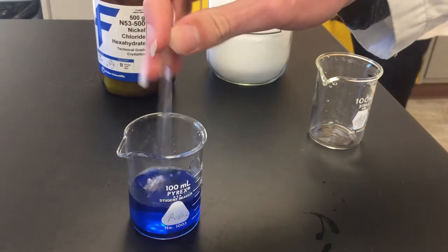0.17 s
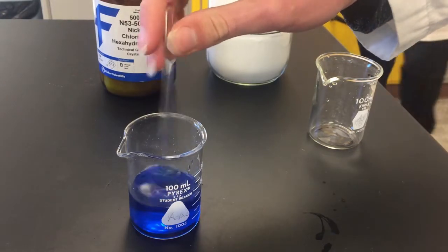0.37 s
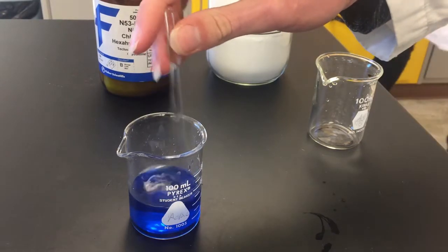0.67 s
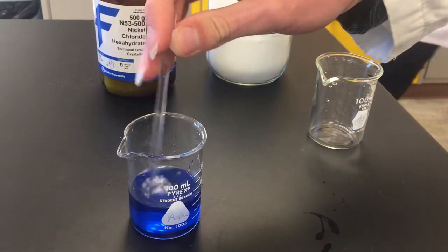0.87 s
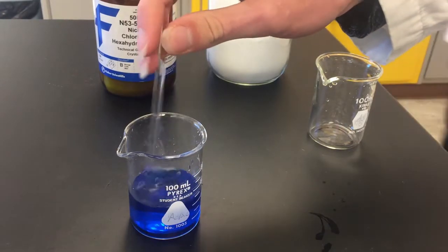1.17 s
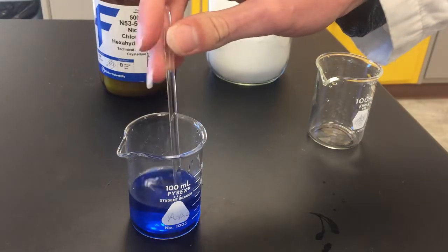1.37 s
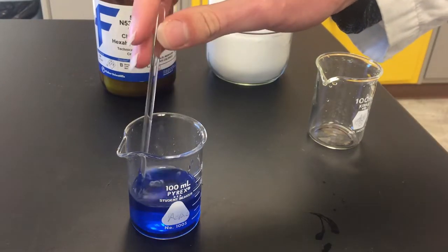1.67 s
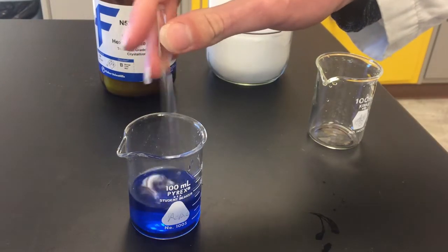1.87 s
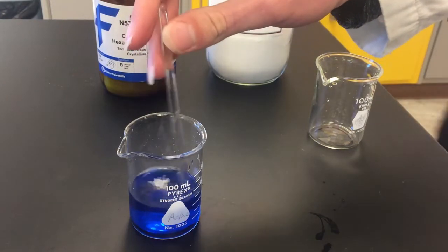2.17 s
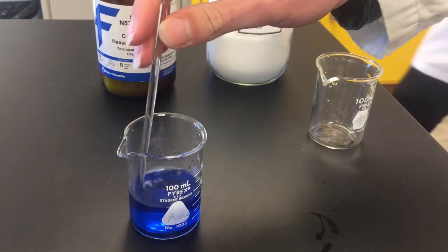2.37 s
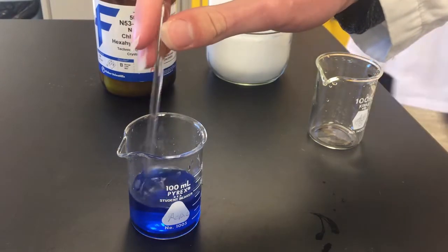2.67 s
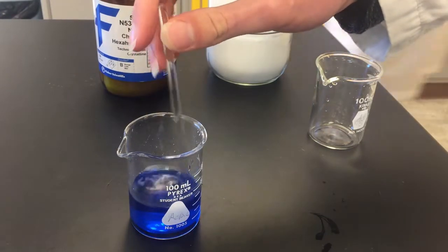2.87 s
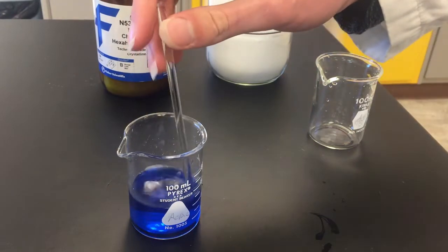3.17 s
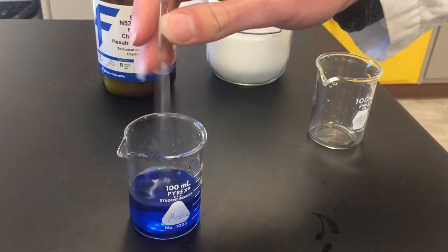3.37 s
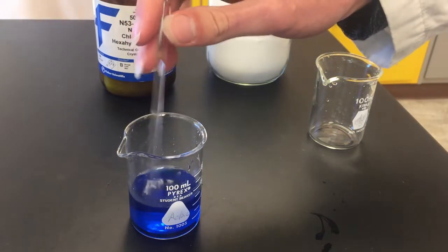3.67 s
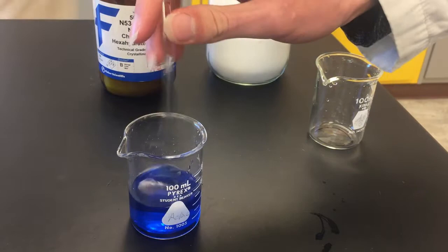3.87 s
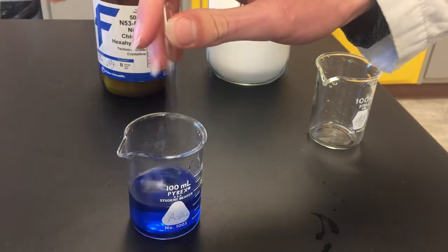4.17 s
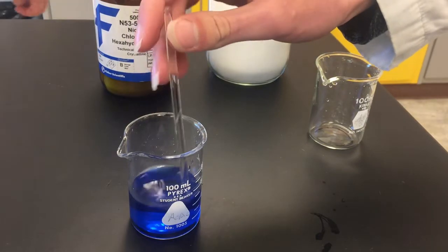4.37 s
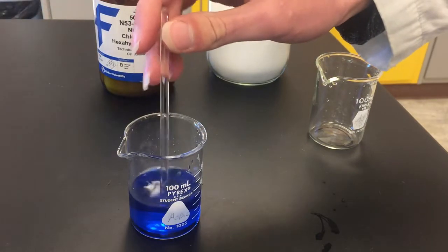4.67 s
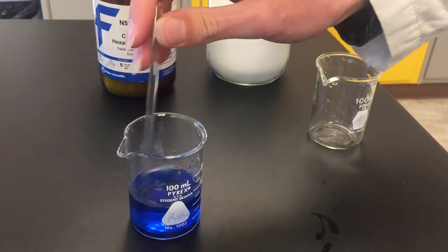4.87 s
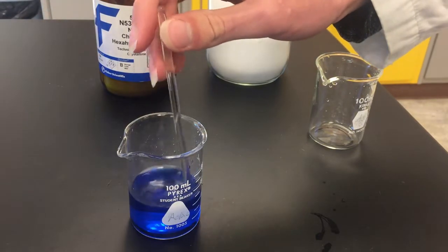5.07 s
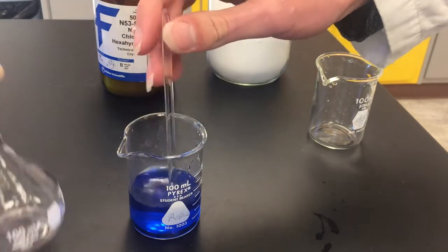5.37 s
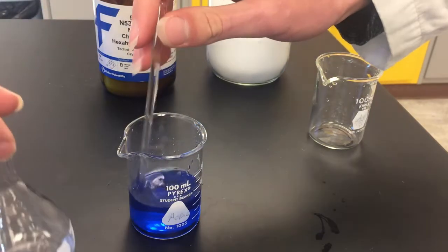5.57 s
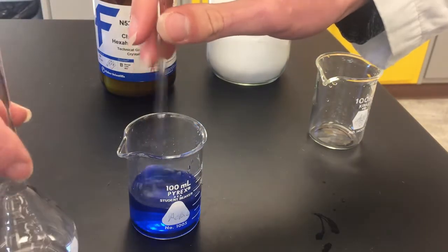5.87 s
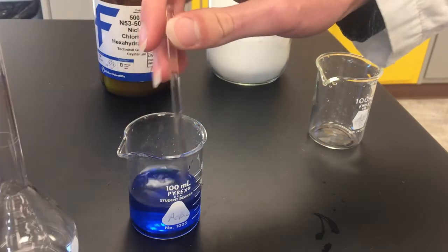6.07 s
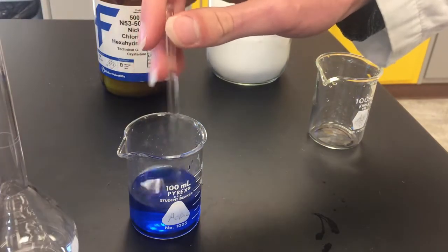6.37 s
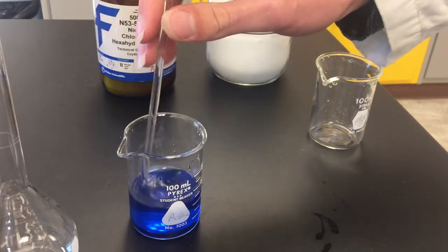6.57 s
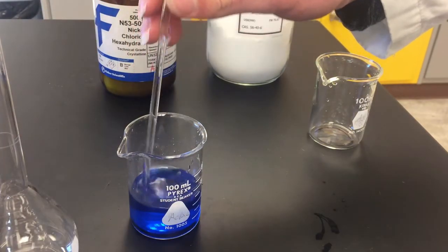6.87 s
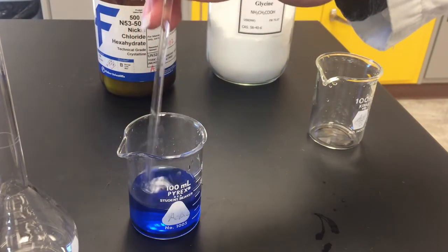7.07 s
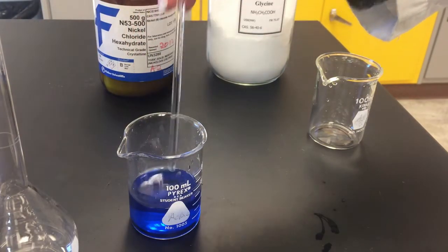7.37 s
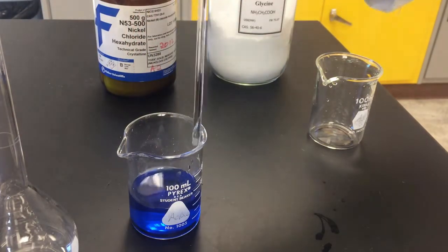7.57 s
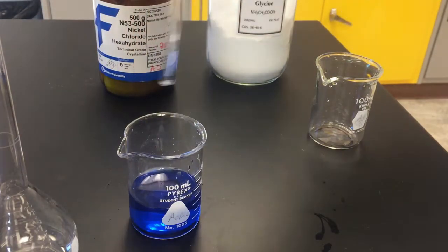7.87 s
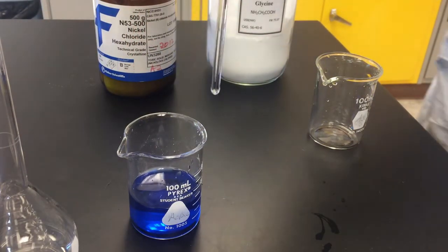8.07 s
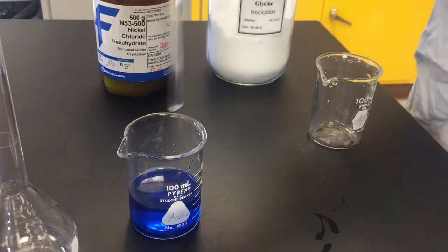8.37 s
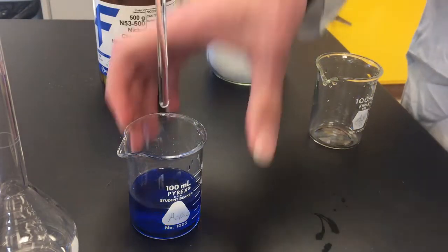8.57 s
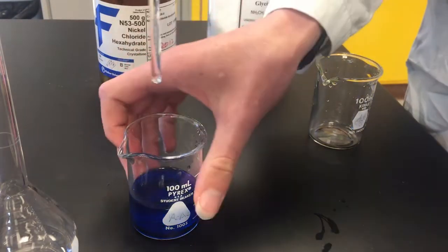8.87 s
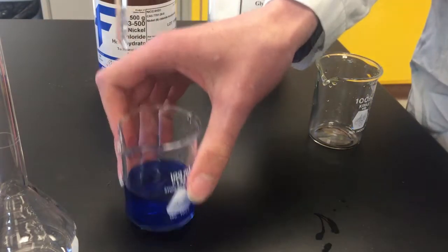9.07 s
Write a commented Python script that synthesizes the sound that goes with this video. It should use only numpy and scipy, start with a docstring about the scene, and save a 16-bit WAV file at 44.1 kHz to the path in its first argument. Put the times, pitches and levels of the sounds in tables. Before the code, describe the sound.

Light clinking and faint swishing as a glass rod stirs a beaker in a quiet laboratory; a flask is set down and rocks.

```python
"""Bright, quick clinks: a glass rod stirs a solution in a small beaker, ringing and skidding on the wall
while the liquid swishes. A flask lands on the bench beside it and rocks to rest; at last a hand takes
the beaker. Each knock on glass is a set of decaying modes plus a burst of gritty noise. Behind, someone
moves about on squeaking soles and ventilation rumbles in the quiet, slightly live laboratory."""
import sys
import numpy as np
from scipy import signal
from scipy.fft import rfft, irfft
from scipy.io import wavfile

SR = 44100
rng = np.random.default_rng(int(sys.argv[2]) if len(sys.argv) > 2 else 0)


def log_audio(samples):
    """Write samples as a 16-bit WAV file to the path given in sys.argv[1]."""
    # one column per channel
    frames = np.atleast_2d(samples).T
    # limit to full scale, then quantise
    limited = np.clip(frames, -1, 1)
    pcm = np.round(limited * 32767).astype(np.int16)
    wavfile.write(sys.argv[1], SR, pcm)


N = 406602
T = np.arange(int(.7 * SR)) / SR  # time axis of a one-shot, s


def undb(db):
    """Decibels to gain."""
    return 10 ** (np.asarray(db) / 20)


def fade(t60):
    """Exponential decay, 60 dB down after t60 seconds."""
    return np.exp(-np.log(1000) * T / max(t60, 1e-3))


def add(track, s, sound):
    """Mix a sound into the track at time s."""
    i = max(int(s * SR), 0)
    track[i:i + len(sound)] += sound[:N - i]


def colour(x, eq):
    """Shape a signal with an EQ curve of (f/Hz, level/dB) points and scale it to rms 1."""
    hz, db = np.transpose(eq)
    f = np.maximum(np.fft.rfftfreq(len(x), 1 / SR), 1)
    shaped = irfft(rfft(x) * undb(np.interp(np.log(f), np.log(hz), db)), len(x))
    return shaped / np.std(shaped)


def ring(modes, scatter_db, detune):
    """Struck modes of alternating sign; each contact point weights and detunes them a little."""
    out = np.zeros(len(T))
    for k, (hz, db, t60) in enumerate(modes):
        weight, shift = rng.uniform(-1.2, 1, 2)
        t = T[:int(1.5 * SR * t60) + 1]
        envelope = undb(db + scatter_db * weight) * np.exp(-np.log(1000) * t / t60)
        out[:len(t)] += (-1) ** k * envelope * np.sin(2 * np.pi * hz * (1 + detune * shift) * t)
    return out


def burst(eq, t60, grain_db):
    """A dying shower of tiny contacts; grain_db sets how uneven they are."""
    noise = rng.standard_normal(len(T))
    grit = undb(grain_db * np.minimum(rng.exponential(size=len(T)), 2))
    return colour(noise * grit, eq) * fade(t60)


def rubbing(strokes, width_s, eq, grain_db):
    """Fine friction grains under a bell-shaped swell for each (t/s, level/dB) stroke."""
    t = np.arange(0, N / SR, .002)
    swell = sum(undb(db) * np.exp(-.5 * ((t - s) / width_s) ** 2) for s, db in strokes)
    noise = rng.standard_normal(N)
    grit = undb(grain_db * np.repeat(rng.exponential(size=N // 64 + 1), 64)[:N])
    return np.interp(np.arange(N) / SR, t, swell) * colour(noise * grit, eq)


# reverb time of the laboratory: f/Hz, t60/s
ROOM_DECAY = [(200, 0.27), (1200, .48), (4000, 0.17), (9000, .29), (14000, 0.11)]

def room(dry, low_db, high_db, build_s):
    """Add diffuse reflections that build up quickly and ring longest in the mids."""
    noise, f = rfft(rng.standard_normal(len(T))), np.fft.rfftfreq(len(T), 1 / SR)
    edges = np.geomspace(80, SR / 2, 14)
    tail = 0
    for lo, hi in zip(edges, edges[1:]):
        hz = np.sqrt(lo * hi)
        band = irfft(noise * ((f >= lo) & (f < hi)), len(T))
        envelope = fade(np.interp(hz, *np.transpose(ROOM_DECAY))) * (1 - np.exp(-T / build_s))
        send = undb(np.interp(hz, [1500, 12000], [low_db, high_db]))
        tail = tail + send * band * envelope / np.linalg.norm(envelope)
    return dry + signal.fftconvolve(dry, tail)[:N]


# EQ of the duct air: f/Hz, level/dB
AIR_EQ = [(15, -63), (25, -28), (49, -6), (123, -2), (166, -6.5), (206, -9), (335, -18.5), (363, -23),
          (560, -30), (863, -27.5), (1940, -34.5), (4030, -36.5), (5000, -42.5), (6210, -39.5),
          (16000, -49)]
# fan and mains tones: f/Hz, level/dB
HUM_TONES = [(63, -67), (120, -66), (204, -69.5)]

def ventilation(air_db=-57.5):
    """The background bed: hiss, a rumble that surges with the unsteady duct flow, and wavering hum."""
    t = np.arange(N) / SR
    knots = np.arange(0, 10, 1 / 6)

    def wander():
        return np.interp(t, knots, rng.standard_normal(len(knots)))

    surge_db = 3.5 * wander()
    air = undb(air_db) * colour(rng.standard_normal(N), AIR_EQ)
    rumble = signal.sosfilt(signal.butter(2, 300, fs=SR, output="sos"), air)
    out = air + (undb(surge_db) - 1) * rumble
    for hz, db in HUM_TONES:
        swell, drift = 1 + wander(), 2 * wander()
        out += np.sqrt(2) * undb(db) * swell * np.sin(2 * np.pi * hz * t + drift)
    return out


# footfalls behind the bench: t/s, level/dB
STEP_CUES = [(.471, -45.5), (.66, -50), (5.558, -52.5)]
# sole squeaks: t/s, level/dB, f/Hz
SQUEAK_CUES = [(0.466, -53, 3720), (0.469, -54.5, 3000), (1.208, -60.5, 4140), (2.583, -48.5, 3860),
               (2.813, -55.5, 4130), (3.999, -65, 4130), (7.22, -68.5, 4040)]

def footsteps():
    """Feet thud dully on the floor; soles squeak in a narrow band of noise as they grip."""
    out = np.zeros(N)
    step_eq = [(100, -11.5), (190, 3.5), (320, -1), (1100, -22), (2600, -33), (4500, -50.5),
               (12000, -62.5)]
    for s, db in STEP_CUES:
        add(out, s, undb(db) * burst(step_eq, t60=.61, grain_db=4))
    attack = 1 - np.exp(-T / .0017)  # the sole takes a moment to grip
    for s, db, hz in SQUEAK_CUES:
        peak_eq = [(hz * .6, -32), (hz * .8, -15), (hz * .94, -9), (hz, 0), (hz * 1.06, -17),
                   (hz * 3, -42)]
        add(out, s, undb(db) * attack * burst(peak_eq, t60=.22, grain_db=0))
    return out


# sleeve brushes: t/s, level/dB
SLEEVE_CUES = [(.83, -70), (1.26, -72.5), (2.83, -69.5), (7.84, -67.5), (8.04, -72), (8.42, -73.5)]
# airy EQ of the cloth: f/Hz, level/dB
SLEEVE_EQ = [(500, -10), (3000, 0), (7000, -2), (13000, -11), (16000, -18)]

def sleeve():
    """Cloth brushes past in faint rustles."""
    return rubbing(SLEEVE_CUES, width_s=.055, eq=SLEEVE_EQ, grain_db=2)


# landing and bounce: t/s, thud level/dB, glass level/dB
LANDING_CUES = [(5.7903, -15, -23.5), (5.7986, -21, -59)]
# knock of the flask's body on the bench: f/Hz, level/dB, t60/s
FLASK_BODY_MODES = [(312, -4, .08), (549, -4, .13), (612, -4, .08), (770, 0, .14), (1000, 0, .07),
                    (1233, -4, .11), (1490, -1, .06), (1615, 1, .13), (2126, -4, .05), (2275, 0, .05),
                    (2385, 2, .05), (2492, 2, .05), (2740, -6, .11)]
# bright ring of the flask's glass: f/Hz, level/dB, t60/s
FLASK_GLASS_MODES = [(3400, -15, .05), (4620, -4, .015), (5370, -17, .22), (5390, -1, .07),
                     (6020, -18, .04), (7200, 0, .009), (7430, -7, .012), (9795, -10, .055),
                     (10015, -10, .06), (11350, -11, .015)]
# EQ of the bench top under a blow: f/Hz, level/dB
BENCH_EQ = [(100, -14.5), (300, 2), (600, -1.5), (1600, 6), (2700, -7.5), (4000, -10), (7000, -20.5),
            (12000, -38.5), (16000, -46.5)]

def flask_landing():
    """The flask lands hard and bounces; coming down flat drives its whole body and the bench."""
    out = np.zeros(N)
    crack_eq = [(500, -13), (2400, -.5), (5000, -7), (11000, -5), (15000, -19.5)]
    for s, thud_db, glass_db in LANDING_CUES:
        body = undb(-10) * ring(FLASK_BODY_MODES, scatter_db=1, detune=.001)
        glass = undb(4) * ring(FLASK_GLASS_MODES, scatter_db=1, detune=.0008)
        bench = undb(-7) * burst(BENCH_EQ, t60=.085, grain_db=3)
        crack = undb(-3) * burst(crack_eq, t60=.03, grain_db=-3)
        add(out, s, undb(thud_db) * (body + bench) + undb(glass_db) * (glass + crack))
    return out


# rocking beats: t/s, thud level/dB, rim level/dB
ROCK_CUES = [(5.982, -29.5, -54), (6.092, -31, -63), (6.148, -29.5, -48.5), (6.203, -36, -70),
             (6.249, -35, -54), (6.281, -30, -61), (6.314, -37, -69.5), (6.338, -40.5, -77)]
# rim of the tilted flask: f/Hz, level/dB, t60/s
FLASK_RIM_MODES = [(1590, 4, .04), (2400, 3, .03), (2750, 4, .07), (2880, 0, .04), (3400, -3, .03),
                   (3800, -6, .04), (5388, -4, .035), (6020, -4, .04), (8440, -11, .15), (10350, -13, .06)]
# EQ of its base rolling on the bench: f/Hz, level/dB
ROLL_EQ = [(150, -22), (330, -6.5), (550, 3), (1000, 1.5), (1600, -4.5), (1900, -14), (2800, -16),
           (4300, -36), (7000, -40), (15000, -49)]

def flask_rocking():
    """The tilted flask rocks ever faster; each time it rolls over one point and its rim sings."""
    out = np.zeros(N)
    attack = 1 - np.exp(-T / .003)
    for s, thud_db, rim_db in ROCK_CUES:
        rim = undb(8) * ring(FLASK_RIM_MODES, scatter_db=3, detune=.004)
        roll = undb(1) * attack * burst(ROLL_EQ, t60=.07, grain_db=3)
        add(out, s, undb(thud_db) * roll + undb(rim_db) * rim)
    return out


# strokes of the rod's tip: t/s, level/dB
SCRAPE_CUES = [(.83, -68), (1.23, -74), (1.35, -67.5), (1.66, -67)]

def scraping():
    """The rod's tip scrapes the wet glass with a thin hiss."""
    scrape_eq = [(2000, -6), (5000, -5.5), (9000, -8), (12500, 1), (16000, -13)]
    return rubbing(SCRAPE_CUES, width_s=.036, eq=scrape_eq, grain_db=2.8)


# swishes of liquid, then of hand and sleeve: t/s, level/dB
SWISH_CUES = [(1.56, -55), (3.1, -65.5), (3.89, -67), (4.03, -61.5), (4.52, -60.5), (5.61, -54.5),
              (7.512, -70.5), (7.851, -65), (8.029, -61.5), (8.28, -67.5)]
# soft, mid-heavy EQ of a swish: f/Hz, level/dB
SWISH_EQ = [(200, -10), (550, -0.5), (1400, 5), (2200, -15), (5000, -14), (15000, -27)]

def swishing(width_s=.023, blip_hz=(581, 1600), decay_cycles=15):
    """Soft swishes of liquid, then of hand and sleeve, each with four faint blips."""
    out = rubbing(SWISH_CUES, width_s, SWISH_EQ, grain_db=3.5)
    for s, db in SWISH_CUES:
        for _ in range(4):
            offset, hz = rng.uniform(-width_s, width_s), rng.uniform(*blip_hz)
            blip = np.sin(2 * np.pi * hz * T) * fade(decay_cycles / hz)
            add(out, s + offset, undb(db + 2) * blip)
    return out


# hand bumps: t/s, knock level/dB, beaker level/dB
BUMP_CUES = [(8.678, -46.5, -81), (9.046, -48.5, -52), (9.108, -70, -81)]
# beaker wall, rung by fingers and by the rod: f/Hz, level/dB, t60/s
BEAKER_MODES = [(2378, 0, .45), (2408, -4, .35), (4350, 3, .11), (6198, -2, .15), (6245, -2, .18),
                (8105, 2, .07), (8380, 1, .05), (12980, -4, .06)]

def grip():
    """Hands bump the bench and take the beaker; soft fingertips wake only its lowest modes."""
    out = np.zeros(N)
    knock_eq = [(100, -1), (320, 8.5), (1100, 5.5), (2600, -3), (4500, -29), (12000, -49)]
    low_modes = [(hz, db - 12 * (hz > 3000), t60) for hz, db, t60 in BEAKER_MODES if hz < 5000]
    for s, knock_db, wall_db in BUMP_CUES:
        wall = ring(low_modes, scatter_db=1, detune=.0004) * fade(.34)
        knock = burst(knock_eq, t60=.38, grain_db=-.5)
        add(out, s, undb(knock_db) * knock + undb(wall_db) * wall)
    return out


# glass rod, damped by fingers and liquid: f/Hz, level/dB, t60/s
ROD_MODES = [(5400, -14, .018), (5580, -15, .016), (8940, -1.5, .014), (9130, -.5, .015), (9450, -7, .005),
             (11250, -12, .004), (13030, -6, .014), (13270, -1, .012), (13440, -4, .012),
             (13800, -5, .0035), (14750, -18, .016), (15500, -21, .01)]
# the beaker's foot on the bench: f/Hz, level/dB, t60/s
FOOT_MODES = [(430, -14, .04), (640, -3, .04), (790, -1, .04), (900, -3, .035), (990, -1, .055),
              (1140, -3, .045), (1495, -1, .075), (1620, -2, .05)]
# EQ of glass skidding on glass: f/Hz, level/dB
SKID_EQ = [(200, -17), (600, -14.5), (1500, 0), (2200, 0), (3100, 7), (3800, -1), (4400, 2.5), (7000, 3.5),
           (12000, -10), (16000, -12.5)]

def clink(strength_db, height, hoop_db):
    """One contact ticks, rings rod and wall, skids briefly and rocks the beaker on its foot."""
    def drive(tip_db, rim_db):
        return strength_db + np.interp(height, [0, 1], [tip_db, rim_db])

    rod_high_db, rod_low_db = drive(0, -34), drive(-10.5, -26)
    tap_db, push_db = drive(-34.5, -31.5), drive(-46.5, -26.5)
    rod_drives = [rod_low_db + 3, rod_low_db, rod_low_db, rod_high_db]
    rod_modes = [(hz, db + np.interp(hz, [6000, 8500, 9500, 12500], rod_drives), t60)
                 for hz, db, t60 in ROD_MODES]
    # the lowest (hoop) pair has its own level, heavy pushes wake the next mode, sharp taps the rest
    wall_drives = [hoop_db] * 2 + [push_db - 7] + [tap_db] * (len(BEAKER_MODES) - 3)
    wall_modes = [(hz, db + gain, t60) for (hz, db, t60), gain in zip(BEAKER_MODES, wall_drives)]
    rod = ring(rod_modes, scatter_db=2.5, detune=.006)
    wall = ring(wall_modes, scatter_db=3, detune=.003)
    foot = undb(push_db - 1) * ring(FOOT_MODES, scatter_db=4, detune=.035)
    tick_eq = [(500, -20), (2000, -21.5), (3200, -11.5), (6000, -3.5), (10000, 10.5), (16000, .5)]
    tick = undb(rod_high_db - 11) * burst(tick_eq, t60=.007, grain_db=1.5)
    skid = undb(push_db + 3) * burst(SKID_EQ, t60=.04, grain_db=5)
    return rod + wall + foot + tick + skid


# rod meets beaker: t/s, strength/dB, height (0 at the tip, 1 on the rim), hoop level/dB,
# flight to the rebound/s, rebound level/dB relative to the hit
TOUCH_CUES = [(.038, -30.5, 0.56, -76.5, 0, 0), (0.1728, -11, 0.017, -75.5, 0.011, -9),
              (0.34, -36, 0.54, -85, 0.0038, 0), (.374, -16.5, 1, -54, 0.00025, -2),
              (.5215, -27, 0.31, -79, 0.003, -3), (0.678, -4, 0.42, -57, .005, 1.5),
              (1.0638, -6.5, 0.82, -54, 0.00017, 0), (1.318, -26, 1, -64.5, 0.0021, 0),
              (1.4845, -5, 0.35, -76, 0.029, -3.5), (1.719, -27, 0.48, -76, 0, -4),
              (1.902, -10.5, 0.88, -54, 0, 2), (1.914, -5.5, 0.66, -75.5, 0.0025, 0),
              (2.0342, -11.5, 0.11, -70, 0, 5), (2.156, -5, 0.12, -75.5, .0294, -11),
              (2.3046, -6, 0.074, -56, 0.02, -13), (2.4609, -11.5, 0.032, -82, 0.034, -11.5),
              (2.6091, -9.5, 0.12, -62.5, .013, -3), (2.9245, -6.5, 0.15, -61.5, .019, -11),
              (3.1636, -29, 0.21, -76.5, 0.0036, 0.5), (3.3976, -2.5, 0.14, -59, 0.046, -10),
              (4.0065, -41, 0.11, -78, 0.0036, -0.5), (4.48, -32, 0.52, -73, 0.0059, -1.5),
              (4.5376, -21, 0.9, -67.5, 0.0017, 4), (4.6538, -8.5, 0.13, -80, 0.033, -4.5),
              (4.7964, -7.5, 0.69, -51, 0.0016, 0), (4.9422, -13.5, 0.018, -87, .01, -7.5),
              (5.268, -25, .8, -72.5, 0.0019, 0), (5.331, -5, 0.16, -63.5, .031, -8),
              (5.497, -8, 0.83, -57, 0, -3), (5.684, -7, 0.088, -59, 0.048, -13),
              (6.0683, -10, 0.33, -62, 0.016, -14), (6.4773, -13.5, 0.18, -70, .0245, -1),
              (6.6809, -7.5, 0.15, -65, 0, 0), (6.8067, -7, 0.19, -53.5, 0.021, -10),
              (7.7224, -17, 0.33, -56, 0.0018, 0.5), (8.955, -37, .38, -70, 0.004, -0.5)]

def stirring(drag_lead_s=.0082):
    """The rod drags along the wall and strikes; if it springs off, it falls back twice."""
    drags = [(s - drag_lead_s, strength_db - 57.5) for s, strength_db, *_ in TOUCH_CUES]
    out = rubbing(drags, width_s=.013, eq=SWISH_EQ, grain_db=3.5)
    for s, strength_db, height, hoop_db, flight_s, rebound_db in TOUCH_CUES:
        hits = [(0, 0)]
        if flight_s > .002:  # the second rebound is quicker and softer
            hits += [(flight_s, rebound_db), (1.31 * flight_s, rebound_db - 13)]
        for lag, db in hits:
            add(out, s + lag, clink(strength_db + db, height, hoop_db + db))
    return out


def scene():
    """Beaker close by, flask beside it, the rest of the laboratory behind; mono."""
    beaker = sleeve() + scraping() + swishing() + grip() + stirring()
    near = room(beaker, low_db=-6.5, high_db=-19.5, build_s=.002)
    beside = room(flask_landing() + flask_rocking(), low_db=-5, high_db=-15.5, build_s=.0061)
    far = room(footsteps(), low_db=-5.5, high_db=-5, build_s=.0057)
    return (near + beside + far + ventilation())[None]


def record(dry):
    """A steep low-pass trims the top above 16.3 kHz."""
    return signal.sosfilt(signal.ellip(8, .2, 80, 16300, fs=SR, output="sos"), dry)


dry = scene()
out = record(dry)
log_audio(out)
```